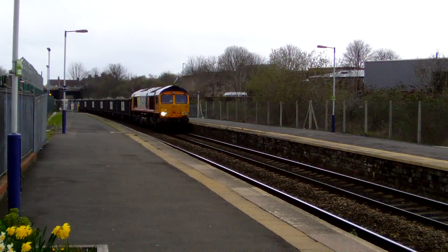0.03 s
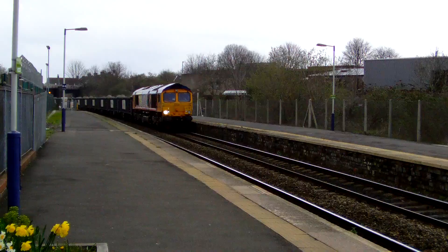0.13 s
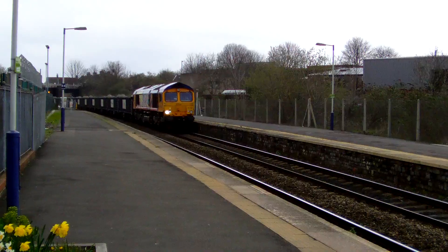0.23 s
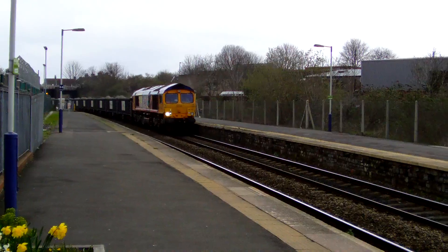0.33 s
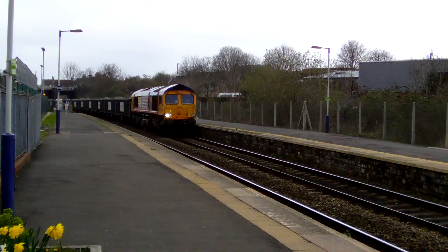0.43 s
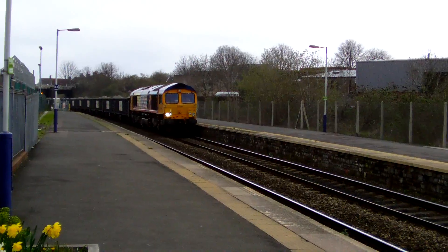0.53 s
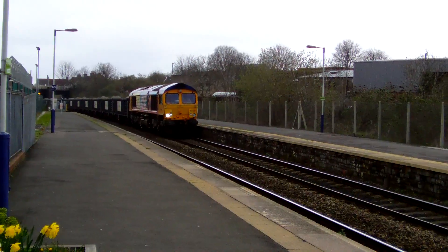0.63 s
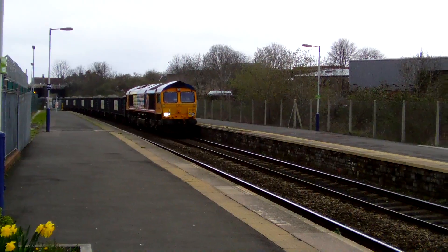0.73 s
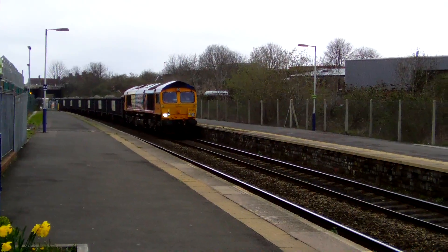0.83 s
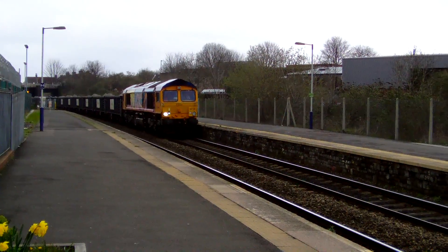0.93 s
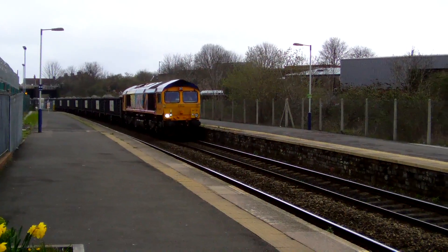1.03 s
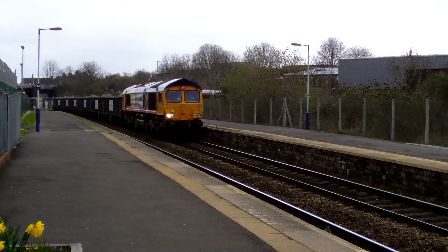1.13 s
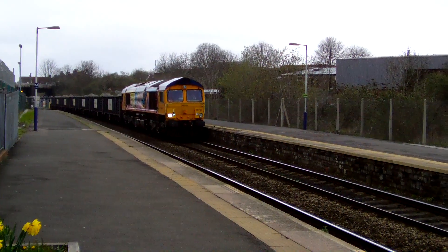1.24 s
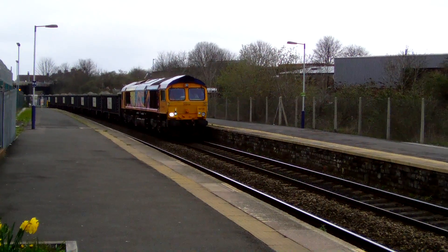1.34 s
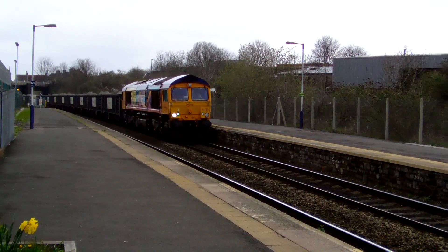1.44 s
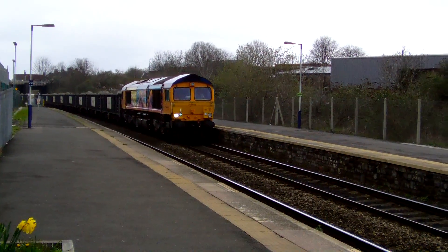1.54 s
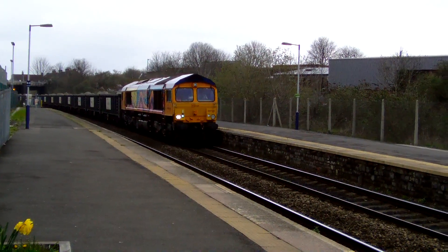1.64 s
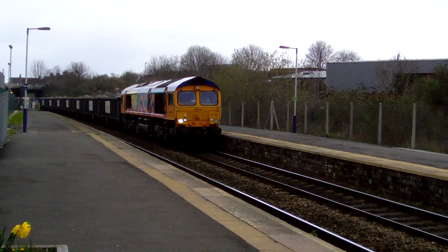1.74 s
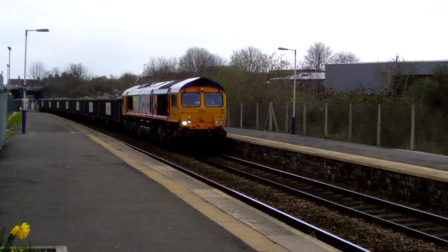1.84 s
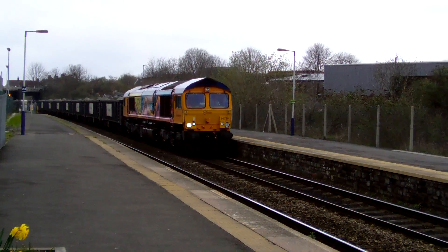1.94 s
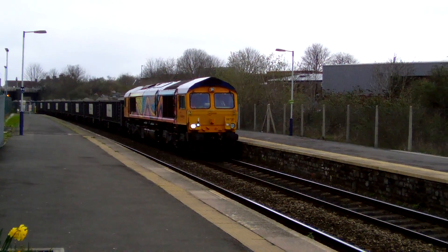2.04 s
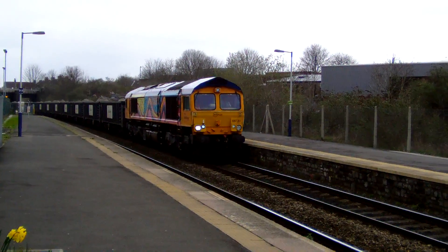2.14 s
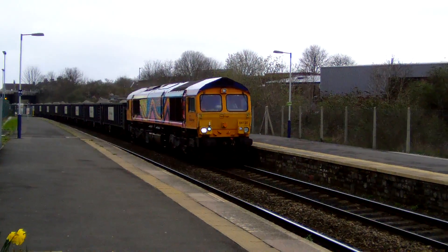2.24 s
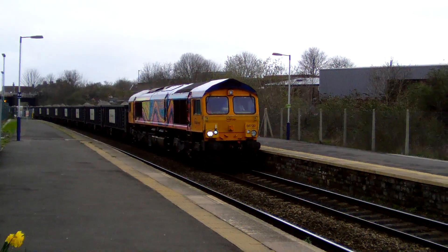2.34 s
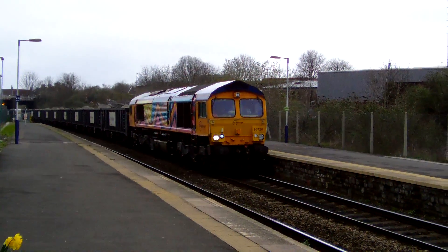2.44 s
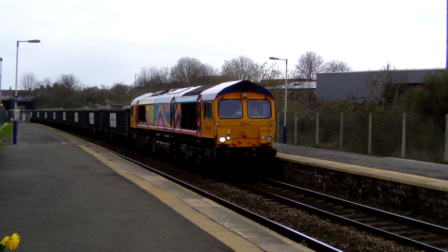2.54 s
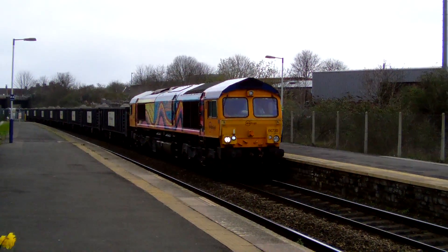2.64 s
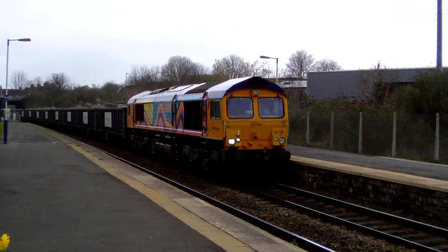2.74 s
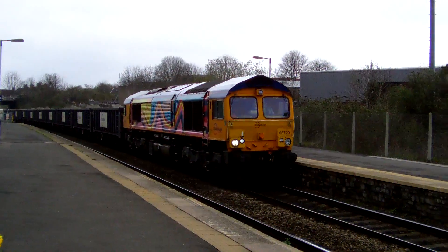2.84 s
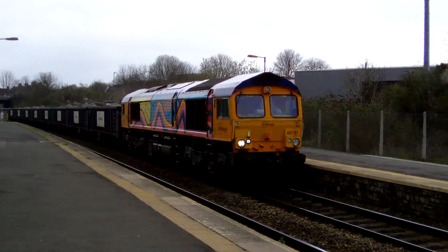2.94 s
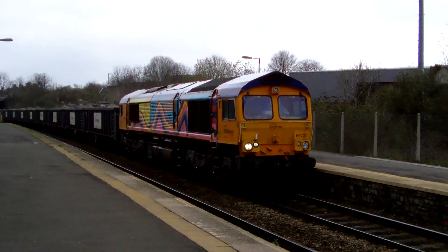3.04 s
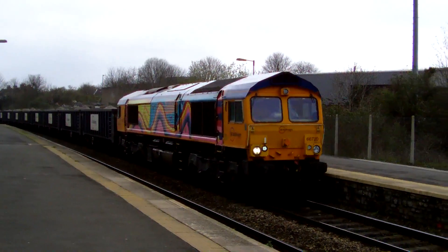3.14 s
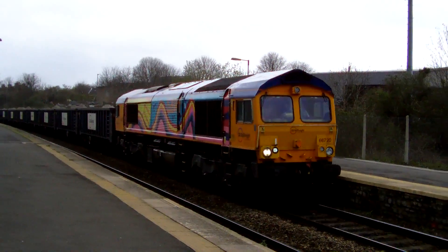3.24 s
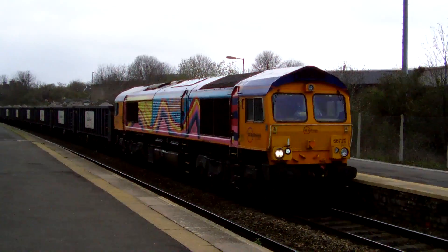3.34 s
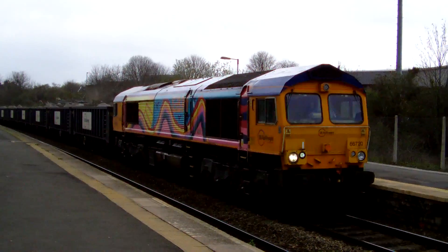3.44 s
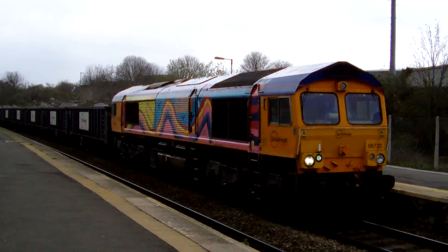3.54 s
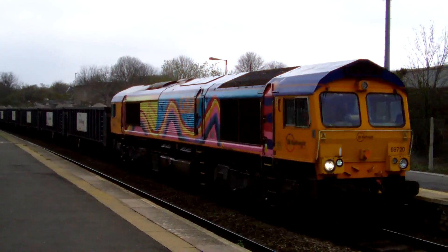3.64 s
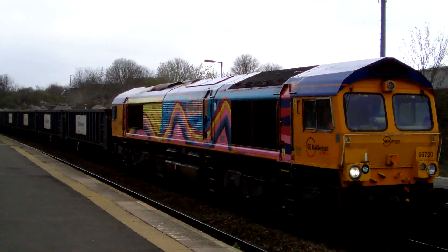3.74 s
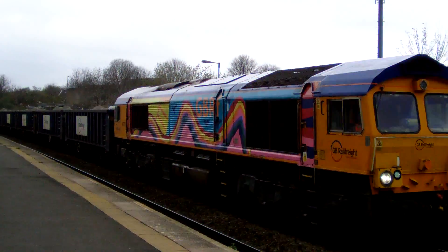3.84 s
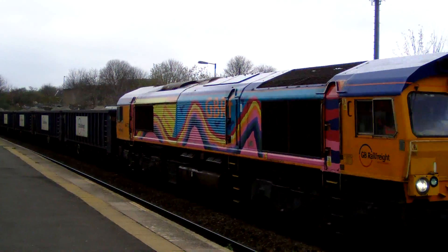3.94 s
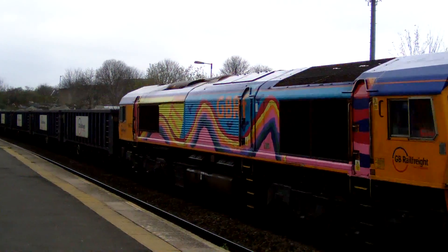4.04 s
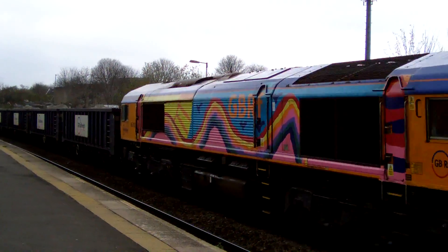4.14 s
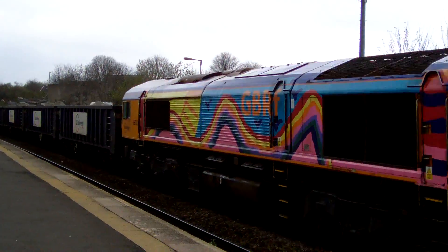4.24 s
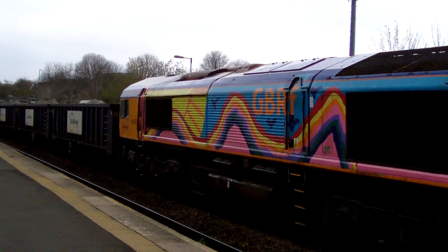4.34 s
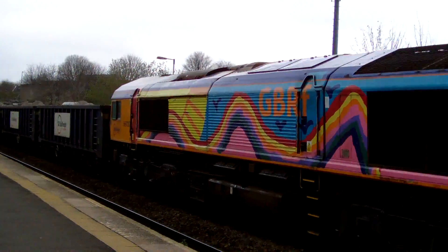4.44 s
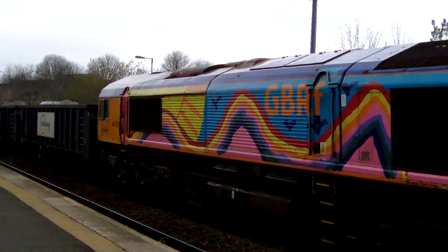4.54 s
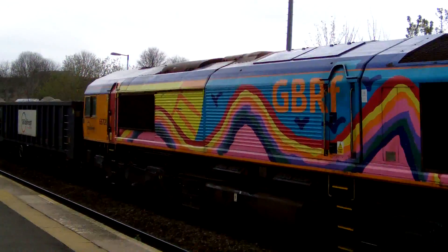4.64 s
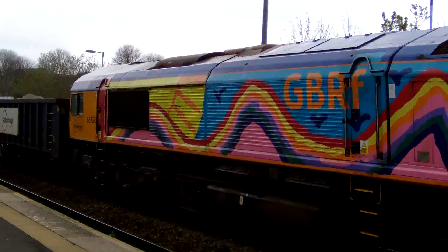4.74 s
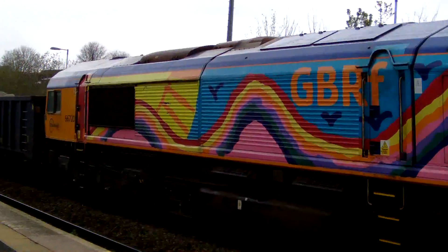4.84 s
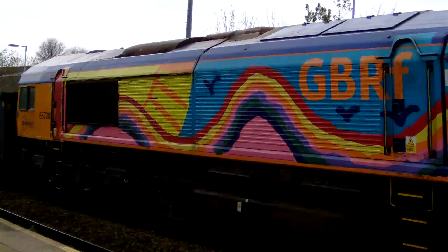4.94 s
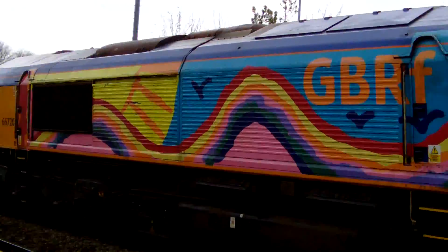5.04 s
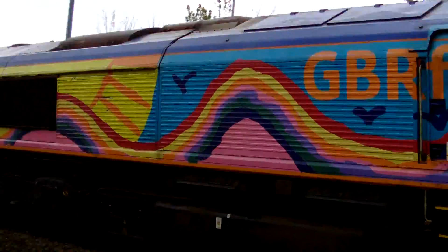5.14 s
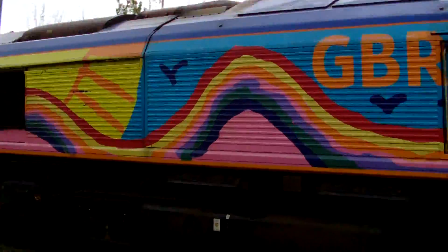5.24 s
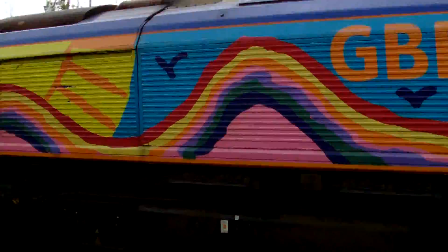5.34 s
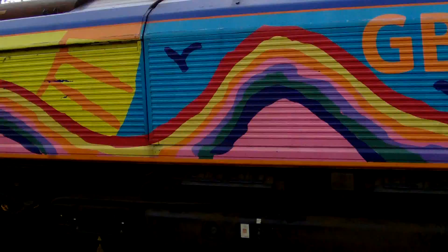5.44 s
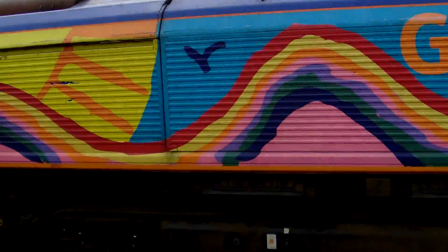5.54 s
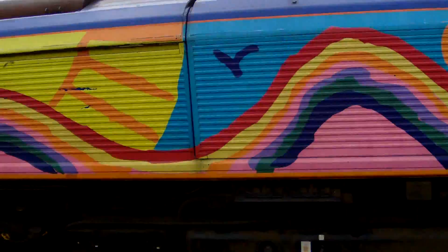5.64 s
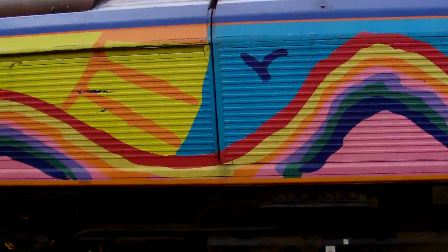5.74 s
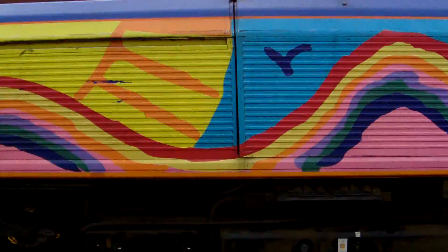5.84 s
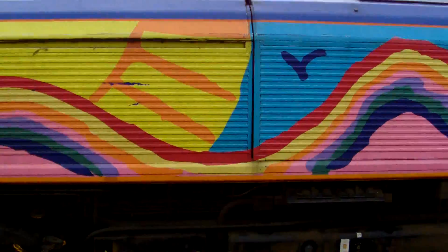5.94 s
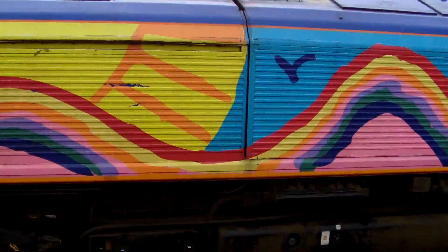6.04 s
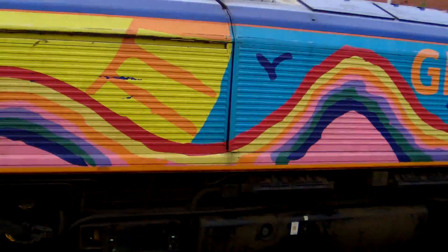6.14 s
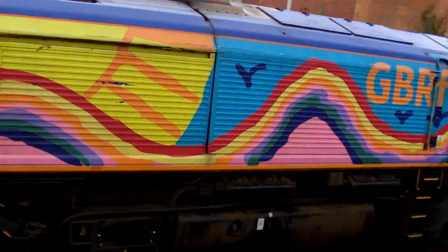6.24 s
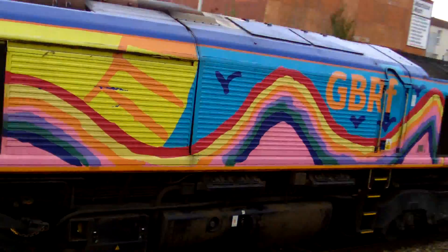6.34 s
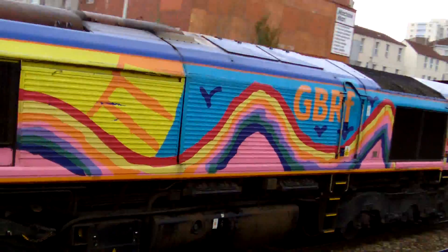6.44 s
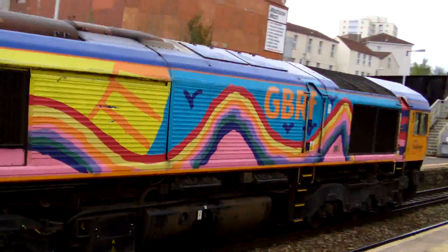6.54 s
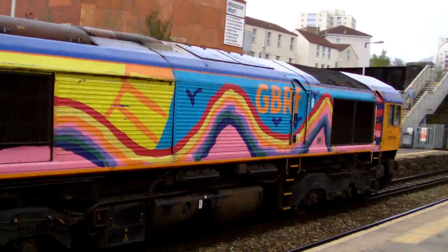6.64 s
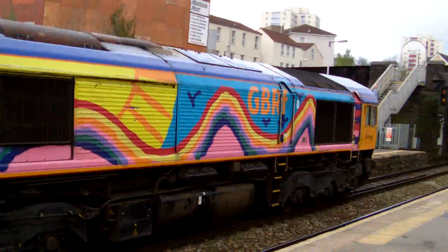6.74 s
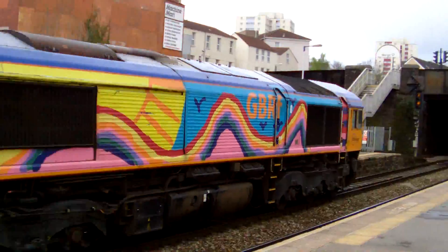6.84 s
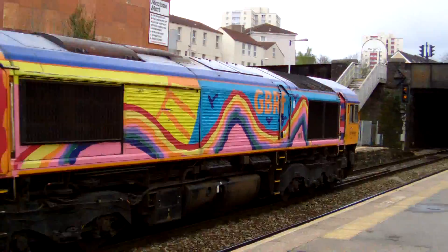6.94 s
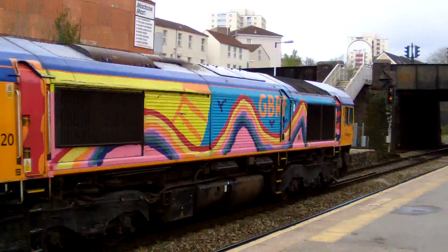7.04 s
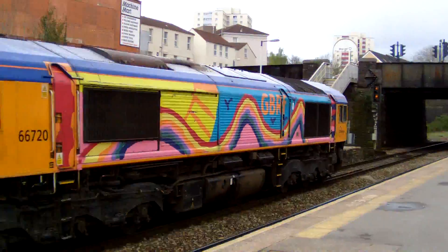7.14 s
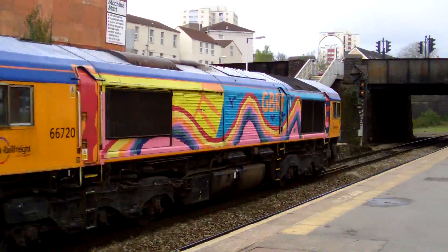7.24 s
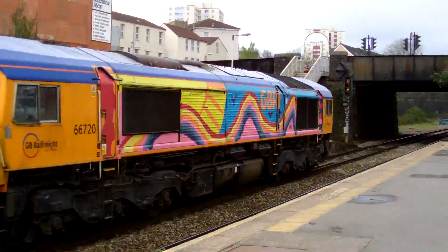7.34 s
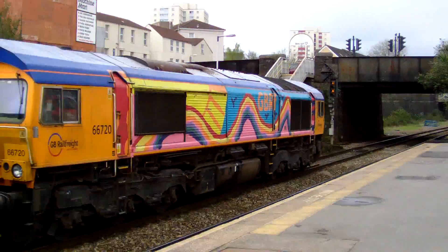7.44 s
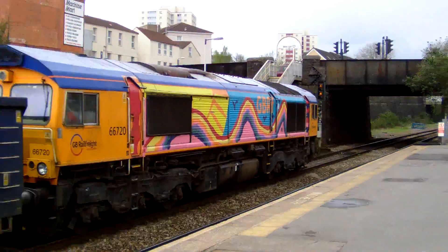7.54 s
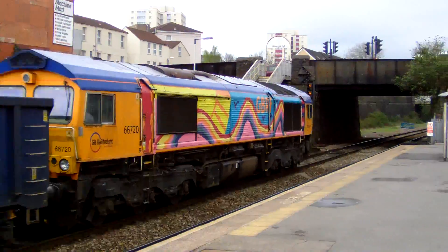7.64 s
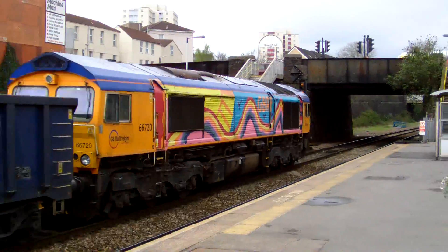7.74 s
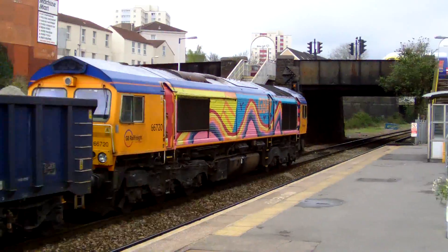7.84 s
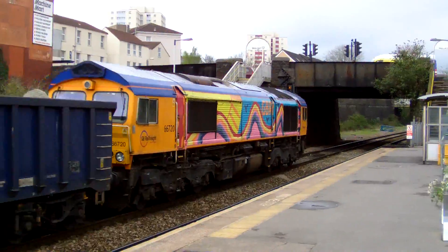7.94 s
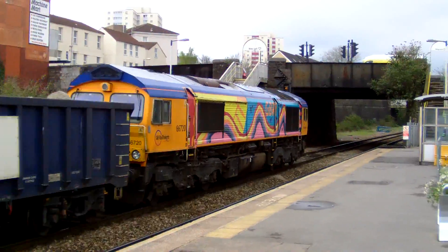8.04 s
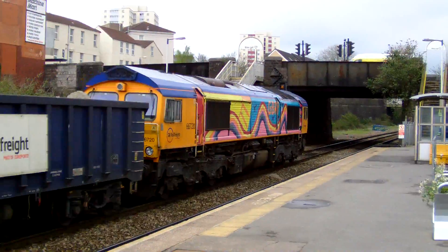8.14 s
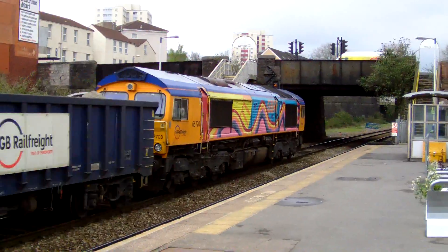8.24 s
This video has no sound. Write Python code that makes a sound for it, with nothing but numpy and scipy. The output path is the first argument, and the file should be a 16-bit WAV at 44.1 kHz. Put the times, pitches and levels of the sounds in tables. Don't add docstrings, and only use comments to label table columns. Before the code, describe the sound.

Faint hiss and far rumble grow into a roaring diesel passing close, with ringing metal sagging in pitch and sharp bursts of released air.

```python
import sys
import numpy as np
from scipy import signal
from scipy.io import wavfile
from scipy.ndimage import uniform_filter1d

SR = 44100
rng = np.random.default_rng(int(sys.argv[2]) if len(sys.argv) > 2 else 0)


def to_wav(sig):
    pcm = np.clip(np.atleast_2d(sig), -1, 1) * 32767
    pcm = np.round(pcm).astype(np.int16)
    wavfile.write(sys.argv[1], SR, pcm.T)


def elevation(decibels):
    levels = np.asarray(decibels, float)
    return 10 ** (levels / 20)


N = 365456
T = np.arange(N) / SR
FRAME, HOP = 1024, 256
HZ, TIMES = np.fft.rfftfreq(FRAME, 1 / SR), np.arange(N // HOP + 5) * HOP / SR


def evened(x):
    return x / np.sqrt(np.mean(abs(x) ** 2) + 1e-20)


def read(points, hz):
    f, value = np.transpose(points)
    return np.interp(np.log(hz + 1), np.log(f + 1), value)


def summed(levels_db):
    return 10 * np.log10((elevation(np.asarray(levels_db)) ** 2).sum(0) + 1e-12)


def bump(middle_s, rise_s, fall_s):
    return -6 * ((TIMES - middle_s) / np.where(TIMES < middle_s, rise_s, fall_s)) ** 2


def drift(rate_hz, count):
    f = np.geomspace(rate_hz / 10, rate_hz, 20)
    phase = rng.random((count, 20, 1))
    waves = np.sin(2 * np.pi * (f[:, None] * TIMES + phase)) / np.sqrt(f)[:, None]
    return evened(waves.sum(1))


def noise(colour, rows, bands, patchy_db, flicker_db, flicker_hz):
    shape_db = read(colour, HZ)
    s, *levels = np.transpose(rows)
    lifts = []
    for db, (lo, hi) in zip(levels, bands):
        band_power = sum(elevation(shape_db[(HZ > lo) & (HZ < hi)]) ** 2)
        lifts.append(np.interp(TIMES, s, db) - 10 * np.log10(band_power))
    centres = [np.sqrt(lo * hi) for lo, hi in bands]
    shares = [read(list(zip(centres, one)), HZ) for one in np.eye(len(bands))]
    a, b, patches = rng.standard_normal((len(TIMES), len(HZ), 3)).T
    patches = uniform_filter1d(patches, size=9, axis=0)
    patches = evened(uniform_filter1d(patches, size=14, axis=1))
    field_db = shape_db[:, None] + np.transpose(shares) @ lifts
    field_db = field_db + patchy_db * patches + flicker_db * drift(flicker_hz, count=1)
    spectra = (a + 1j * b) * elevation(field_db)
    return np.sqrt(2 / 3) * signal.istft(spectra, nperseg=FRAME, noverlap=FRAME - HOP)[1][:N]


def singing(hz, width_hz):
    step = 32
    r = np.exp(-np.pi * width_hz * step / SR)
    draws = [1, 1j] @ rng.standard_normal((2, N // step + 2))
    slow = signal.lfilter([1], np.convolve([1, -r], [1, -r]), draws)
    slow = np.interp(np.arange(N) / step, np.arange(len(slow)), slow)
    return evened((slow * np.exp(2j * np.pi * np.cumsum(hz) / SR)).real)


def doppler(abreast_s):
    speed_m_s, distance_m, sound_m_s = 10.5, 8.0, 343
    ahead_m = speed_m_s * (abreast_s - T)
    return 1 / (1 - speed_m_s / sound_m_s * ahead_m / np.hypot(ahead_m, distance_m))


# abreast t/s, then level/dB of rumble, body, upper roar, top
PARTS = [
    (4.5, -46, -40, -36, -32.5),
    (5.25, -35.5, -34, -30, -27),
    (6.0, -37.5, -35.5, -35, -34.5),
    (6.5, -44, -38.5, -30, -24),
    (7.5, -39.5, -40.5, -36, -29),
    (8.4, -41, -40.5, -29.5, -34),
]
FALL_DB = [21.1, 18.4, 24.6, 21.93]
LULL_DB = [-1, -5, -4, 0]


def passing():
    speed_m_s, nearest_m = 10.5, 5.46
    abreast_s, *levels = np.transpose(PARTS)
    reach_m = np.hypot(speed_m_s * (TIMES - abreast_s[:, None]), nearest_m)
    far = np.log10(reach_m / nearest_m)
    lull = elevation(bump(6.51, 0.03, 0.03))
    return [summed(db[:, None] - fall_db * far) + lull_db * lull
            for db, fall_db, lull_db in zip(levels, FALL_DB, LULL_DB)]


# low f/Hz, high f/Hz
ROAR_BANDS = [(350, 850), (1000, 2000), (2500, 4000), (4500, 6500)]
# f/Hz, level/dB
ROAR_SPECTRUM = [(30, -74), (100, -44), (200, -23), (400, -6.5), (640, -1), (1000, -4),
                 (1500, -3.5), (1900, -4.5), (2400, -4.5), (2650, -10.5), (3050, -7), (3300, -11), (3600, -8),
               (4600, -9), (5450, -2), (6100, -11.5), (7100, -21.5), (8200, -32), (15500, -75)]


def roar():
    rows = np.transpose([TIMES, *passing()])
    return noise(ROAR_SPECTRUM, rows, ROAR_BANDS,
                 patchy_db=0.77, flicker_db=-0.12, flicker_hz=8.3)


# f/Hz at rest, width f/Hz, level/dB over body
# roar, abreast t/s, loudest t/s, spread t/s
RINGS = [(575, 62, -14.5, 5.8, 2.2, 4.8), (587, 6.9, -1, 4.4, 9.92, 1.95), (657, 60, -9.5, 5.4, 4.96, 4.2),
         (1170, 18, -14, 5.1, 11, 2.6), (1361, 49, -10, 5.6, 6.2, 6.6), (1816, 66, -8.5, 5.6, 3.2, 3.9),
         (1866, 70, -11, 5.6, 7.1, 3.5), (2357, 34, -8.5, 4.7, 8.5, 5.3),
         (2660, 14, -11.5, 8.1, 5.33, 0.89), (2978, 39, -7, 8.5, 5.37, 0.83),
         (4130, 36, -11, 4.9, 3.8, 2.9), (3534, 150, -6.5, 4.9, 4.77, 0.63), (4370, 25, -15, 5.4, 5, 1.7),
         (5080, 18, -28, 7.6, 4.9, 0.24), (5400, 23, -1, 6.4, 6.1, 0.19), (200.5, 58, -31.5, 5.5, 2.7, 5.3),
         (386, 7, -13, 5.5, 4.05, .55), (386, 9, -12, 5.5, 7.85, .45), (3056, 14, -12, 5.8, 3.3, 1.1),
        (3052, 16, -11, 5.8, 7.0, 1.2), (2378, 8, -8, 5.4, 3.4, .2), (3645, 35, -15, 5.5, 2.5, 2.5)]


def rings():
    _, body_db, *_ = passing()
    parts = RINGS
    waver_db = 1.5 * drift(8.0, count=len(parts))
    out = np.zeros(N)
    for (hz, width_hz, db, abreast_s, loudest_s, spread_s), waver in zip(parts, waver_db):
        level_db = db + bump(loudest_s, spread_s, spread_s) + waver
        out += np.interp(T, TIMES, elevation(level_db)) * singing(hz * doppler(abreast_s), width_hz)
    return elevation(np.interp(T, TIMES, body_db)) * out


# t/s, level/dB
WHINE_LEVEL = [(2.2, -66), (4.0, -52), (4.9, -37), (5.2, -40), (5.5, -29.5), (5.85, -29.5), (6.1, -32),
               (6.6, -34), (6.9, -30), (7.2, -38), (7.6, -33.5), (8.0, -50)]


def whine():
    blade_hz, abreast_s = 5560, 5.91
    throb_hz, throb_peak_s, throb_db = 15, 5.57, 5.5
    pulse_db = throb_db * np.cos(2 * np.pi * throb_hz * (T - throb_peak_s))
    wobble = 1 + 0.0007 * np.interp(T, TIMES, drift(20, count=1)[0])
    waver_db = 1.4 * np.interp(T, TIMES, drift(6.0, count=1)[0])
    level_db = np.interp(T, *np.transpose(WHINE_LEVEL)) + waver_db
    phase = 2 * np.pi * np.cumsum(blade_hz * doppler(abreast_s) * wobble) / SR
    return elevation(level_db + pulse_db) * np.sin(phase)


# low f/Hz, high f/Hz
AIR_BANDS = [(3500, 6500), (7500, 11500), (12500, 15000)]
# f/Hz, level/dB
AIR_COLOUR = [(100, -95), (1000, -26.5), (1800, -18.5), (3200, -10), (4300, -3), (5000, 3), (5500, 6.5),
              (6000, -0.5), (6900, -13.5), (9000, -20.5), (11000, -26), (13500, -35), (14200, -31),
              (15300, -25)]
# opens t/s, to top t/s, fall t/s, rush level/dB, fizz level/dB
BLASTS = [
    (5.212, 0.056, 0.14, -21, -47),
    (5.35, .15, .12, -29, -60),
    (7.712, 0.019, .08, -28, -51),
    (7.775, .19, 0.15, -8.5, -37.5),
]


def valves():
    opens_s, to_top_s, fall_s, rush_db, fizz_db = np.transpose(BLASTS)[:, :, None]
    rise_s = 0.57 * to_top_s
    shut_db = -60 * (TIMES < opens_s)
    swell_db = bump(opens_s + to_top_s, rise_s, fall_s) + shut_db
    late_db = bump(opens_s + 1.2 * to_top_s, rise_s, fall_s) + shut_db
    hiss_db = -0.5 + fizz_db + 0.48 * (rush_db - fizz_db)
    levels_db = [summed(rush_db - 14 + 1.6 * swell_db),
                 summed(rush_db + 0.99 * swell_db),
                 summed(hiss_db + late_db),
                 summed(fizz_db + 0.75 * swell_db)]
    return noise(AIR_COLOUR, np.transpose([TIMES, *levels_db]), [(2000, 3160), *AIR_BANDS],
                 patchy_db=0.8, flicker_db=0.4, flicker_hz=40)


# f/Hz, level/dB
FAN_COLOUR = [(100, -95), (800, -27), (3000, -11), (4500, -10), (5500, 1.5), (6100, -6), (6600, -36),
              (7600, -23), (8600, -18.5), (9600, -23), (10300, -31), (12000, -35), (13500, -43),
              (15300, -40)]
# t/s, level/dB
FAN_LEVEL = [(0.9, -78), (2.5, -68), (4.0, -63), (5.1, -52.5), (5.6, -45), (6.2, -42), (6.7, -39.5),
             (7.5, -43.5), (8.1, -47)]


def fans():
    hiss_db = np.interp(TIMES, *np.transpose(FAN_LEVEL))
    fizz_db = -27 + 0.73 * hiss_db
    return noise(FAN_COLOUR, np.transpose([TIMES, hiss_db, fizz_db]), AIR_BANDS[1:],
                 patchy_db=0.24, flicker_db=1.3, flicker_hz=25.25)


# t/s, peak level/dB, f/Hz
TICKS = [(3.1173, -50, 15000), (4.0412, -48, 14200), (4.995, -43, 12000), (5.0155, -32, 13900),
         (5.2674, -33, 14900), (5.3094, -37, 12700), (5.4031, -35, 11400), (5.7824, -48, 11330),
         (6.135, -31, 12200), (6.3425, -37, 14900), (6.3844, -25, 14900), (6.4038, -26, 11900),
         (6.4303, -38, 14100), (6.4647, -35, 13600), (6.5054, -40, 12400), (6.5134, -44, 11200),
         (6.545, -33, 12660), (6.5644, -26, 11600), (6.7094, -45, 12000), (7.9369, -26, 14700)]
FAR_TICKS = [
    (2.3462, -57, 8210),
    (2.455, -58, 8090),
    (2.5523, -53, 8460),
    (2.6889, -55, 8330),
]
# t/s, peak level/dB, f/Hz, length t/s
CLANKS = [
    (6.53, -27, 2929, 0.03),
    (6.537, -27.5, 1841, 0.024),
    (6.549, -29, 3430, .014),
]


def ticks():
    out, t = np.zeros(N), np.arange(200) / SR
    for s, db, hz in TICKS + FAR_TICKS:
        at = round(s * SR)
        out[at:at + len(t)] += elevation(db + 1.5 - 60 * t / 0.0011) * np.sin(2 * np.pi * hz * t)
    for s, db, hz, length_s in CLANKS:
        arch = np.sin(np.pi * np.clip((T - s) / length_s, 0, 1))
        out += elevation(db) * arch * np.sin(2 * np.pi * hz * T)
    return out


# f/Hz, level/dB
WIND_COLOUR = [(30, -38), (60, -19), (120, -18), (200, -0.5), (400, 2), (600, -0.5), (1000, -37)]
# t/s, level/dB, half length t/s
GUSTS = [(0.8, -74, .05), (0.99, -74, .03), (1.5, -75, 0.042), (2.12, -73, .06), (2.44, -68, 0.055),
         (2.88, -62, .04), (3.12, -50.5, 0.096), (3.52, -64, 0.071), (3.88, -57, 0.081), (4.1, -60, .07),
         (4.5, -54, 0.032), (4.75, -55, .05), (5.005, -56, .08), (5.5, -58, 0.065), (5.78, -62, .06),
         (6.028, -53, 0.13), (6.4, -52.5, 0.09), (6.574, -56, 0.087)]


def gusts():
    breeze_db = -18 + 1.25 * passing()[0]
    level_db = summed([breeze_db] + [db + bump(s, half_s, half_s) for s, db, half_s in GUSTS])
    return noise(WIND_COLOUR, np.transpose([TIMES, level_db]), [(90, 250)],
                 patchy_db=1.5, flicker_db=1.5, flicker_hz=40)


# t/s, peak level/dB
SLAPS = [(0.75, -59), (0.775, -58), (0.849, -57), (0.98, -55), (2.395, -47), (2.484, -56), (2.848, -49),
         (2.87, -46), (2.954, -50), (3.07, -54), (3.154, -56), (3.449, -50), (3.797, -53), (3.902, -47),
         (4.033, -49), (4.129, -53), (4.469, -45), (5.005, -43), (6.6, -55)]


def slaps():
    slap_s, lag_s, bass_cut_hz = 0.00032, 0.009, 230.0
    pushes, t = np.zeros(N), np.arange(1000) / SR
    u = t / slap_s
    for s, db in SLAPS:
        at = round((s + lag_s) * SR)
        pushes[at:at + len(t)] += elevation(db + 24.5) * u ** 2 * np.exp(-u)
    return signal.lfilter(*signal.butter(3, bass_cut_hz, "high", fs=SR), pushes)


# f/Hz, level/dB
SELF_NOISE = [(5000, -34), (8500, -18), (9510, -5), (10600, -6.5), (14700, -4), (15200, 0)]


def self_noise():
    level_db = -68.5
    return noise([(100, -70)] + list(SELF_NOISE), [(0, level_db), (9, level_db)], [(9000, 15200)],
                 patchy_db=0, flicker_db=0, flicker_hz=1)


def scene():
    train = roar() + rings() + whine() + valves() + fans() + ticks()
    return (train + gusts() + slaps() + self_noise())[None]


def top_cut(x):
    return signal.sosfilt(signal.butter(12, 16660, fs=SR, output="sos"), x)


# f/Hz, width f/Hz
NOTCHES = [(292, 52), (312, 161), (900, 133)]


def record(dry):
    duck_from_db, duck_share, duck_s, edge_hz = -19, 0.37, 0.11, 15310
    power = uniform_filter1d(dry ** 2, size=round(duck_s * SR))
    power_db = 10 * np.log10(abs(power) + 1e-12)
    x = dry / elevation(duck_share * np.maximum(power_db - duck_from_db, 0))
    x = x - 0.046 * x ** 3
    for hz, width_hz in NOTCHES:
        x = signal.lfilter(*signal.iirnotch(hz, hz / width_hz, SR), x)
    edge = signal.firwin(1023, edge_hz, window=("kaiser", 9), fs=SR)
    mix = signal.oaconvolve(x, edge[None], "same")
    return top_cut(mix)


dry = scene()
out = record(dry)
to_wav(out)
```